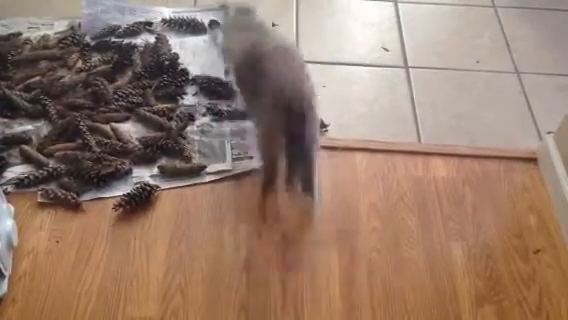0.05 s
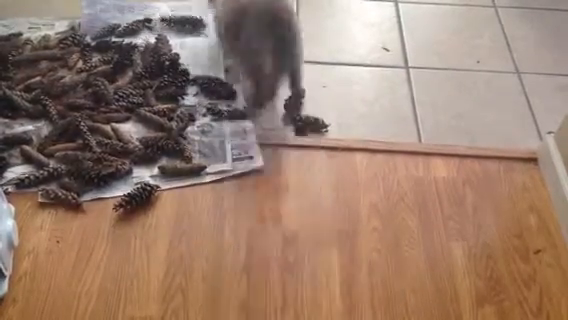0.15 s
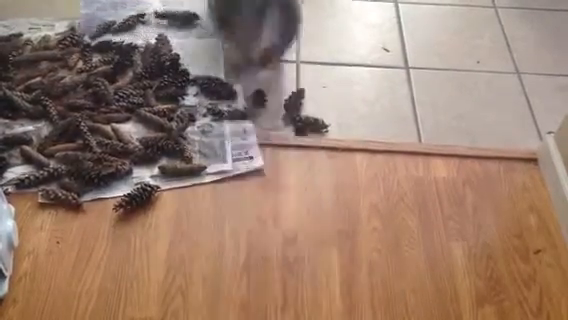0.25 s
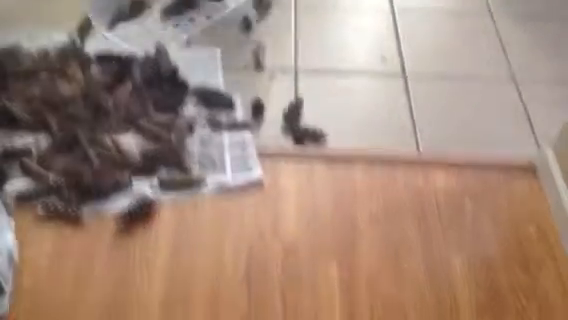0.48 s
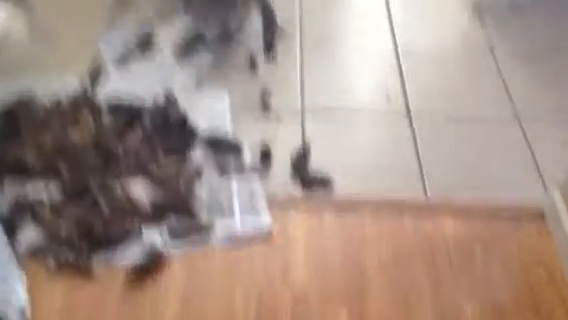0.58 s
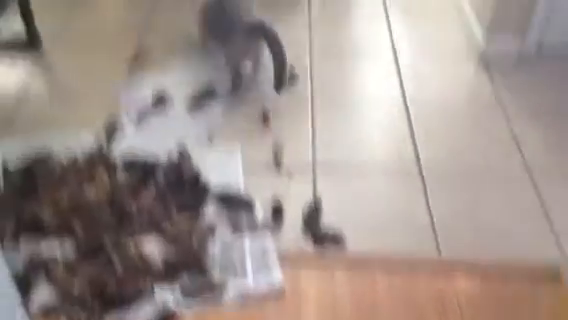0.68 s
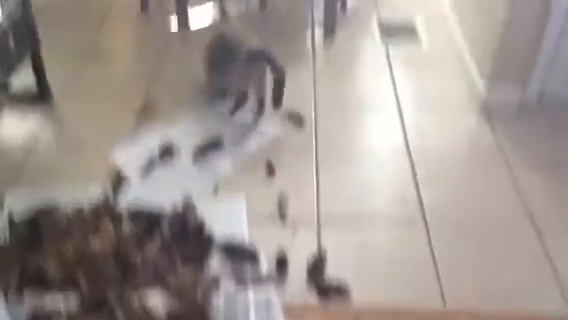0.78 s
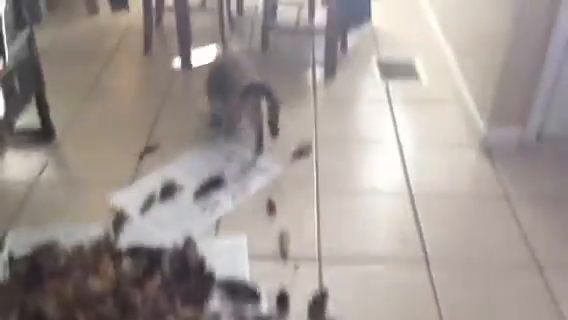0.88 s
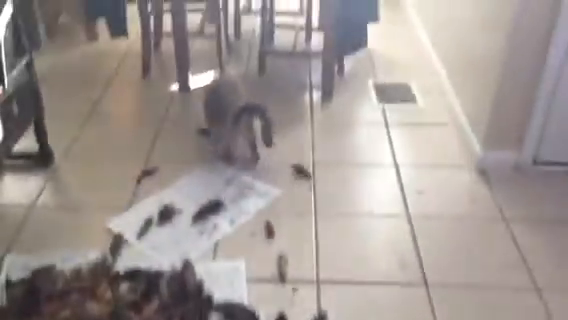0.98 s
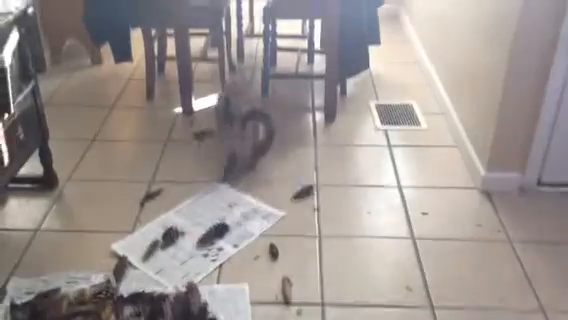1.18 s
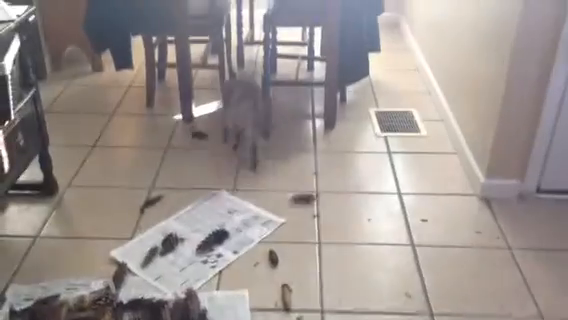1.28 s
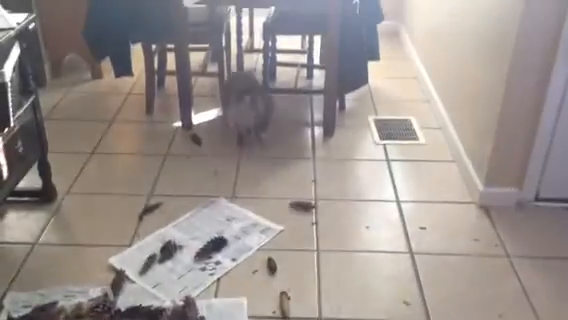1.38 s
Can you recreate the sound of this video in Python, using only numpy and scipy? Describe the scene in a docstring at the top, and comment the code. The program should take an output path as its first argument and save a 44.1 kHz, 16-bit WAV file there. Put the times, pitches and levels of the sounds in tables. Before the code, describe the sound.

Newspaper crinkles and slides as a cat scrambles over it, building to a sharp rattle of dry pine cones. Then soft paws patter away while loose cones skip faintly over tiles in a slightly echoing room.

```python
"""Newspaper crinkles and dry pine cones rasp as a cat bolts across them, dragging a sheet onto tiles.
Creases pop over the hiss of sliding paper, and the sheet snaps taut under the kicks.
The cones rattle as their woody scales catch and ring; loose ones then skip and roll over the floor.
Soft paw thumps patter away in a fairly live room, over quiet room tone."""
import sys
import numpy as np
from scipy import signal
from scipy.fft import rfft, irfft
from scipy.io import wavfile

SR = 44100
rng = np.random.default_rng(int(sys.argv[2]) if len(sys.argv) > 2 else 0)


def waveform_to_disk(signal):
    """Save audio, clipped to [-1, 1], as 16-bit WAV at the path in sys.argv[1]."""
    frames = np.transpose(np.atleast_2d(signal))
    scaled = np.clip(frames, -1, 1) * 32767
    samples = np.round(scaled).astype(np.int16)
    wavfile.write(sys.argv[1], SR, samples)


N = 63945
T, HZ = np.arange(N) / SR, np.fft.rfftfreq(N, 1 / SR) + 1


def amp(db):
    """Decibels to gain."""
    return 10 ** (np.asarray(db) / 20)


def unit(x):
    """Scale to rms 1."""
    return x / np.sqrt(np.mean(x ** 2) + 1e-20)


def read(points, hz):
    """Interpolate a table on a log-frequency axis."""
    f, value = np.transpose(points)
    return np.interp(np.log(hz + 1), np.log(f + 1), value)


def add(mix, start_s, sound):
    """Mix a sound in at start_s."""
    part = mix[max(round(start_s * SR), 0):][:len(sound)]
    part += sound[:len(part)]


def colour(x, gain):
    """Filter a full-length signal by a gain per frequency."""
    return irfft(rfft(x) * gain, N)


def band(x, hz, half_width_oct, order=1):
    """Band-pass resonance around hz."""
    edges_hz = np.clip([hz / 2 ** half_width_oct, hz * 2 ** half_width_oct], 10, SR / 2 - 500)
    return signal.sosfilt(signal.butter(order, edges_hz, "bandpass", fs=SR, output="sos"), x)


def clicks(per_s, size, spread_db=1.5):
    """Random impulses of either sign and uneven strength."""
    strength = amp(spread_db * np.minimum(rng.exponential(1, size), 3))
    return strength * rng.choice([-1., 1.], size) * (rng.random(size) < per_s / SR)


# room tone spectrum: f/Hz, relative density/dB
AIR_SPECTRUM = [(20, -42), (35, -20), (55, 3.5), (80, -6), (120, 0.5), (200, -9.5), (370, -5.5), (600, -11),
                (1200, -16.5), (3000, -19.5), (15000, -22.5)]

def room_tone(level_db=-64):
    """Steady noise, mostly low rumble."""
    return amp(level_db) * unit(colour(rng.standard_normal(N), amp(read(AIR_SPECTRUM, HZ))))


# reverberation time: f/Hz, T60/s
ROOM_DECAY = [(150, 0.63), (1000, 0.37), (3500, 0.41), (8000, 0.34), (15000, 0.36)]

def echoes(bounces=10, early_s=.014, early_db=-6, tail_db=-7.5):
    """The room from one spot: early bounces off floor and walls, then a diffuse tail."""
    noise = rng.standard_normal(SR) * np.minimum(T[:SR] / early_s, 1)
    hz, t, spectra = signal.stft(noise, SR, nperseg=256)
    decay = amp(-60 * t / read(ROOM_DECAY, hz)[:, None])
    tail = signal.istft(spectra * decay, SR, nperseg=256)[1]
    response = amp(tail_db) * tail / np.linalg.norm(tail)
    for delay_s, sign in zip(early_s * rng.random(bounces), rng.choice([-1, 1], bounces)):
        add(response, delay_s, np.array([sign * amp(early_db) / np.sqrt(bounces)]))
    return response


def room(direct, spots=4, step_s=.015):
    """The sound comes from shifting spots, each with its own echoes."""
    out = direct
    for spot in range(spots):
        steps_away = abs((T / step_s - spot) % spots - spots / 2)
        crossfade = np.cos(np.pi / 2 * np.minimum(steps_away, 1))
        out = out + signal.fftconvolve(direct * crossfade, echoes())[:N]
    return out


# rolling envelope: t/s, level/dB
ROLL_ENVELOPE = [(.85, -93), (1.0, -58.5), (1.181, -64), (1.27, -65), (1.36, -64.5), (1.45, -62)]
# rolling spectrum: f/Hz, relative density/dB
ROLL_SPECTRUM = [(500, -6.5), (1800, -7.5), (3400, -1.5), (5800, -2), (9000, -8.5), (15000, -13)]

def rolling_cones(clicks_per_s=9700):
    """Cones tumble on over the tiles with a faint scratching."""
    times_s, level_db = np.transpose(ROLL_ENVELOPE)
    scratch = colour(clicks(clicks_per_s, N), amp(read(ROLL_SPECTRUM, HZ)))
    return (T > times_s[0]) * amp(np.interp(T, times_s, level_db)) * unit(scratch)


# floor modes: f/pitch, relative level/dB
FLOOR_RING = [(.72, -19), (1.0, 2.5), (1.359, -3.5), (1.8, -7.5)]
# paw blows on paper and floor: t/s, level/dB, pitch f/Hz
PAW_BLOWS = [(.236, -59, 194), (.24, -59.5, 99), (.265, -65, 294), (0.486, -63, 284), (.545, -58.5, 343),
             (.6, -69, 72), (0.657, -47.5, 184.3), (.685, -55, 209.5), (.722, -48, 193.3),
             (.73, -48.5, 328), (0.813, -71, 75.4), (0.926, -61.5, 290.4), (1.061, -65.5, 119),
             (1.197, -66, 65), (1.392, -72, 63.6)]

def paw(level_db, hz, rise_s=.0049, decay_s=.021):
    """A soft paw drives the floor's modes in a quickly damped thump."""
    t = T[:SR // 5]
    ring = sum(amp(db) * np.sin(2 * np.pi * (hz * ratio * t + rng.random())) for ratio, db in FLOOR_RING)
    thump = ring * np.minimum(t / rise_s, 1) * np.exp(-t / decay_s)
    return amp(level_db) * unit(thump) * np.sqrt(decay_s / t[-1])


# rasps under a paw: t/s, level/dB, f/Hz, length/s
PAW_SCRAPES = [(0.193, -43, 3400, 0.078), (0.427, -47.5, 595, 0.035)]

def scrape(level_db, hz, length_s, slips_per_s=2500):
    """A cone or the sheet is ground along: quick slips feed one narrow resonance."""
    t = T[:SR // 5]
    slips = clicks(slips_per_s, len(t)) * np.exp(-(t / length_s) ** 6)
    rasp = band(slips, hz, half_width_oct=.12, order=2)
    return amp(level_db) * unit(rasp) * np.sqrt(length_s / t[-1])


# cone modes: f/pitch, relative level/dB, T60/s
CONE_RING = [(.77, -14, 0.0043), (1.0, 11, 0.0063), (1.42, 8, 0.0042), (2.0, 10, 0.002)]
# a cone is struck, scraped or lands: t/s, level/dB, pitch f/Hz, length/s
CONE_HITS = [(0.1937, -45, 3500, 0.0043), (.204, -53, 3600, 0.018), (0.242, -46, 3560, 0.0096),
             (0.689, -39, 4100, 0.01), (0.699, -37, 3900, 0.0041), (.726, -24, 4030, 0.0054),
             (.741, -35, 4150, 0.0074), (0.748, -36, 2610, 0.014), (0.768, -35.5, 4000, 0.018),
             (0.903, -55, 4160, 0.01), (.942, -52, 3770, 0.0031), (1.101, -59, 3460, .01),
             (1.111, -52, 4180, 0.0066), (1.151, -59, 3600, 0.0037), (1.185, -58, 5460, 0.0071),
             (1.208, -52.5, 2760, 0.012), (1.214, -57, 5640, 0.0034), (1.305, -56.5, 3380, 0.011),
             (1.351, -59.5, 5700, 0.0092), (1.391, -61, 4040, 0.004), (1.398, -57, 4260, .011),
             (1.435, -61.5, 4400, 0.018)]

def cone(level_db, hz, length_s, scales=4, catches_per_s=4500, detune=.11):
    """Woody scales catch in quick succession, each with a short, slightly different ring."""
    t, rattle = T[:SR // 10], 0
    for pitch_hz in hz * (1 + detune * np.linspace(-1, 1, scales)):
        ring = sum(amp(db - 60 * t / t60_s) * np.sin(2 * np.pi * pitch_hz * ratio * t)
                   for ratio, db, t60_s in CONE_RING)
        catches = clicks(catches_per_s / scales, len(t)) * np.exp(-(t / length_s) ** 2)
        rattle = rattle + signal.fftconvolve(catches, ring)[:len(t)]
    radiated = band(rattle, hz=5160, half_width_oct=1.13, order=2)  # a small cone gives off little bass
    return amp(level_db) * unit(radiated) * np.sqrt(length_s / t[-1])


def creases(per_s=5000, pitches=28, decay_cycles=2.37):
    """Tiny fractures, each ringing for a few cycles at its own pitch; white on average."""
    t, crackle = T[:SR // 20], np.zeros(N)
    for hz in np.geomspace(200, 15000, pitches):
        ring = np.exp(-t * hz / decay_cycles) * np.sin(2 * np.pi * hz * t)
        pops = clicks(per_s / pitches, N, spread_db=1)
        crackle += np.sqrt(hz) * unit(signal.oaconvolve(pops, ring)[:N])
    return unit(crackle)


# paper spectrum: f/Hz, relative density/dB
PAPER_SPECTRUM = [(80, -20), (160, -6.5), (300, -5.5), (450, -7.5), (650, 0), (900, -2), (1450, 0),
                  (2700, -4), (4000, -2), (6000, -2.5), (8300, -4.5), (12000, -9.5), (15000, -13)]
# crinkle envelope: t/s, mid level/dB before trim, treble/dB re mid, body/dB re mid
DRAG_ENVELOPE = [(0.187, -45.5, -14, -12), (0.193, -41, 0, -12), (0.251, -39.5, -2, -10.5),
                 (0.289, -44, 0, -7.5), (0.361, -45, 0.5, -12.5), (0.445, -31.5, -7, -13.5),
                 (0.505, -39, -4, -6), (0.639, -37, -5, -5.5), (0.731, -26, -10.5, -10),
                 (0.739, -31.5, -10.5, -13), (0.811, -40, -8.5, -7), (0.823, -35, -8, -11),
                 (0.891, -62.5, -9, -7), (0.9, -60, -2, -22)]

def dragged_sheet(friction_db=1.5, body_hz=1750, treble_hz=6480, release_s=.03, trim_db=-3.5):
    """Creases pop over the fine friction of sliding paper; the top dulls as the sheet moves away."""
    times_s, mid_db, treble_db, body_db = np.transpose(DRAG_ENVELOPE)
    excitation = creases() + amp(friction_db) * rng.standard_normal(N)
    paper = colour(excitation, amp(read(PAPER_SPECTRUM, HZ)))
    body = 1 / (1 + (HZ / body_hz) ** 6)
    treble = 1 / (1 + (treble_hz / HZ) ** 6)
    bands = (body, mid_db + body_db), (1 - body - treble, mid_db), (treble, mid_db + treble_db)
    crinkle = sum(unit(colour(paper, gain)) * amp(np.interp(T, times_s, db)) for gain, db in bands)
    gate = (T > times_s[0]) * np.exp(-np.maximum(T - times_s[-1], 0) / release_s)
    return amp(trim_db) * gate * crinkle


# the sheet snaps taut under a kick or flaps down: t/s, level/dB, length/s, centre f/Hz
PAPER_SNAPS = [(.192, -46.5, 0.01, 11000), (.217, -50, .008, 10300), (.239, -41.5, .014, 2270),
               (.364, -43.5, 0.011, 8000), (0.419, -38, 0.0051, 6300), (0.621, -42, .006, 3500),
               (.430, -37.5, 0.029, 6170), (.468, -37, 0.008, 1740), (.559, -38, 0.012, 6500),
               (.608, -38, 0.0038, 8000), (.651, -33, 0.007, 4750), (.694, -28.5, 0.0056, 4260),
               (0.721, -30, 0.0011, 8060), (.724, -27, 0.0083, 1900), (.822, -52, 0.0062, 6960),
               (1.0342, -50.5, 0.014, 5740), (1.049, -57, 0.012, 9000)]

def snap(level_db, length_s, hz, creases_per_s=7200):
    """A tight run of creases gives way together."""
    t = T[:SR // 10]
    pops = clicks(creases_per_s, len(t)) * np.exp(-(t / length_s) ** 2)
    burst = band(pops, hz, half_width_oct=.63)
    return amp(level_db) * unit(burst) * np.sqrt(length_s / t[-1])


def scene():
    """Paper, cones and paws in the room, over room tone."""
    direct = dragged_sheet() + rolling_cones()
    for source, events in (snap, PAPER_SNAPS), (cone, CONE_HITS), (scrape, PAW_SCRAPES), (paw, PAW_BLOWS):
        for start_s, *settings in events:
            add(direct, start_s, source(*settings))
    return (room_tone() + room(direct))[None]


def record(dry, low_cut_hz=53, high_cut_hz=15330):
    """Bass roll-off and steep treble limit."""
    highpass = signal.butter(3, low_cut_hz, "highpass", fs=SR, output="sos")
    lowpass = signal.firwin(511, high_cut_hz, window=("kaiser", 9), fs=SR)
    return signal.oaconvolve(signal.sosfilt(highpass, dry), lowpass[None], "same")


dry = scene()
out = record(dry)
waveform_to_disk(out)
```